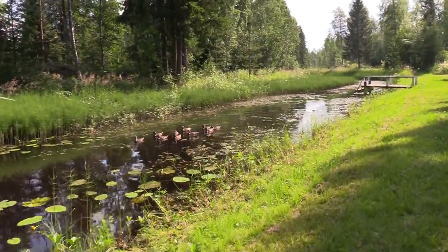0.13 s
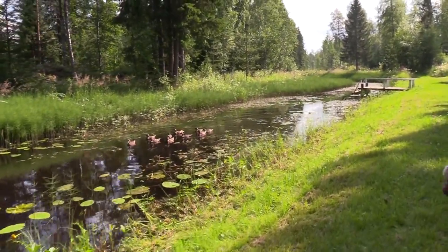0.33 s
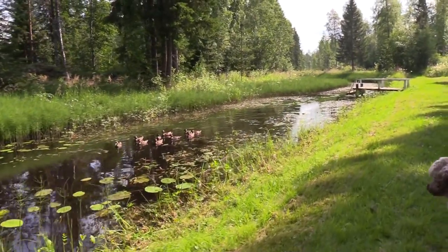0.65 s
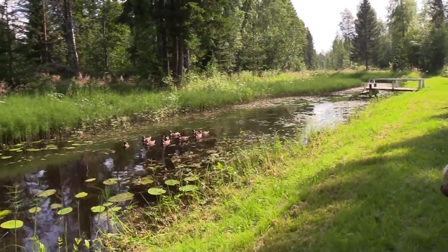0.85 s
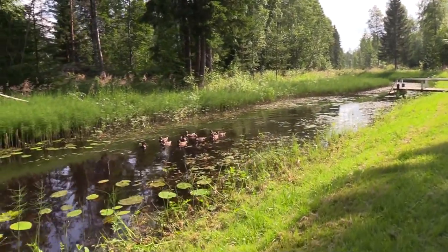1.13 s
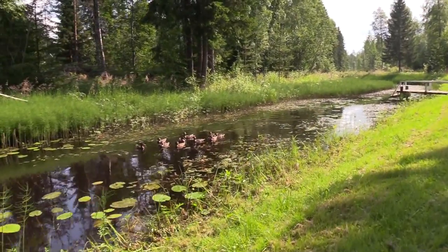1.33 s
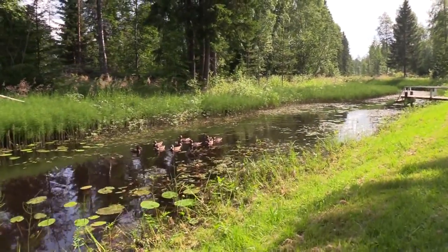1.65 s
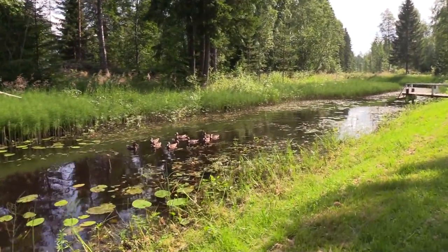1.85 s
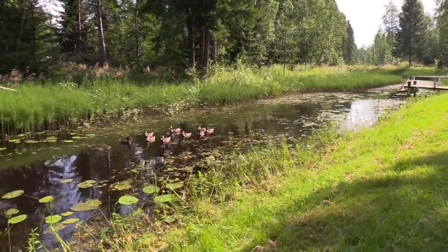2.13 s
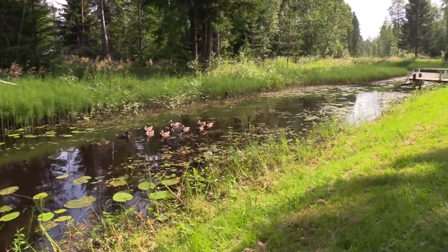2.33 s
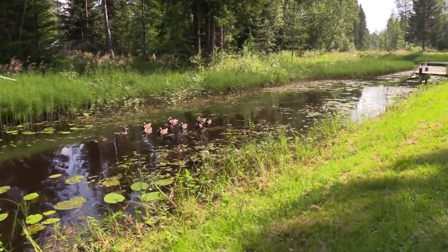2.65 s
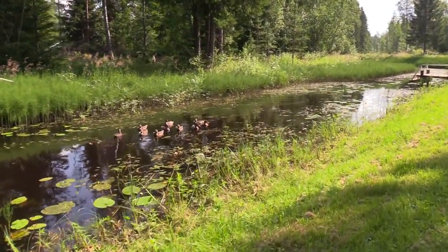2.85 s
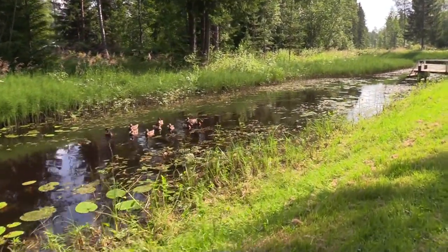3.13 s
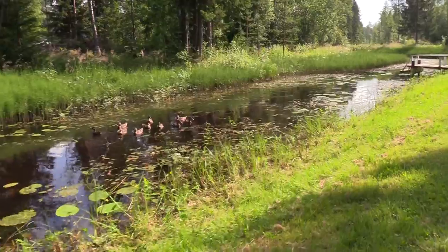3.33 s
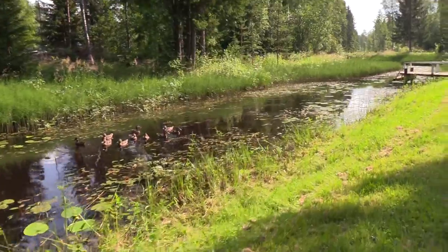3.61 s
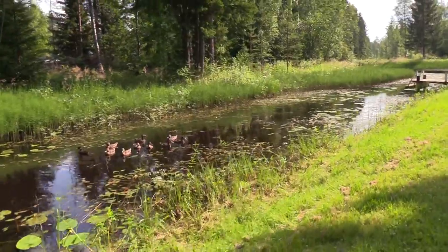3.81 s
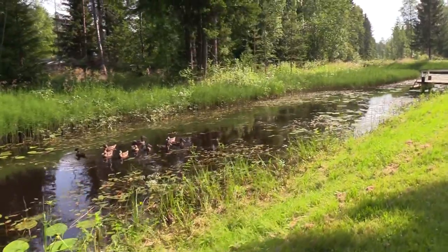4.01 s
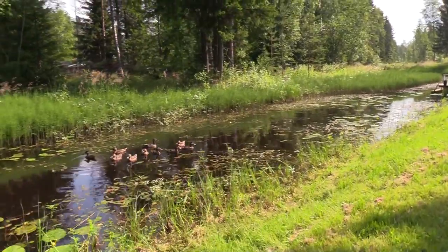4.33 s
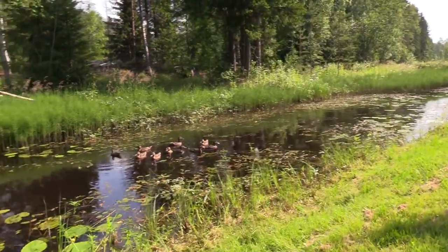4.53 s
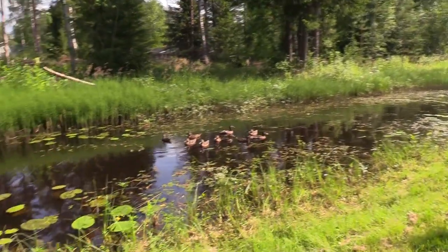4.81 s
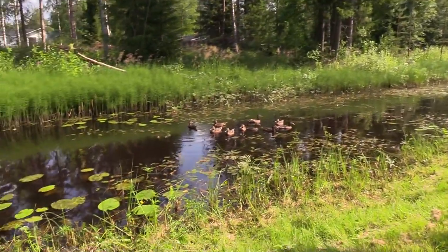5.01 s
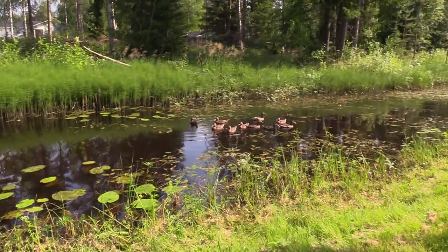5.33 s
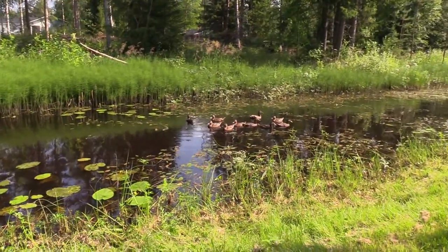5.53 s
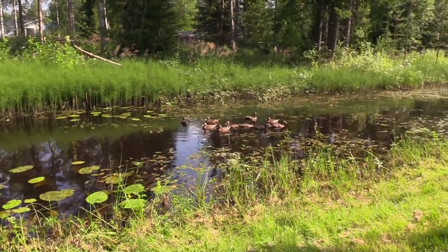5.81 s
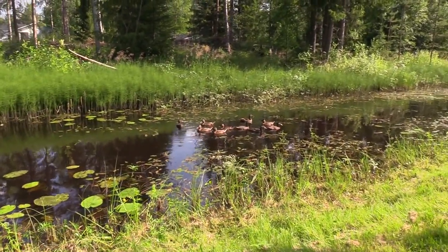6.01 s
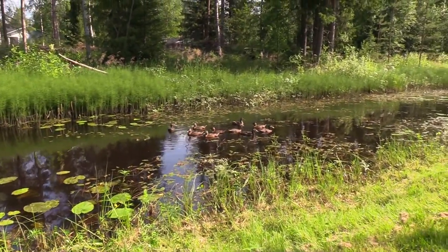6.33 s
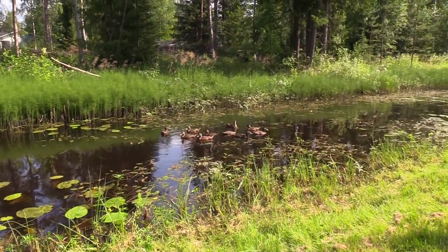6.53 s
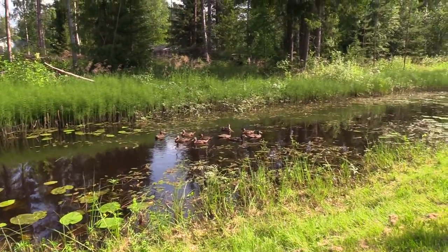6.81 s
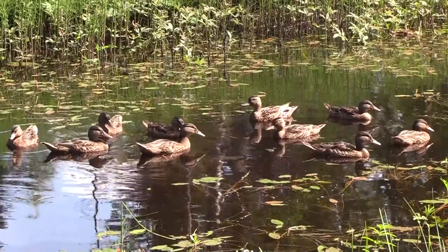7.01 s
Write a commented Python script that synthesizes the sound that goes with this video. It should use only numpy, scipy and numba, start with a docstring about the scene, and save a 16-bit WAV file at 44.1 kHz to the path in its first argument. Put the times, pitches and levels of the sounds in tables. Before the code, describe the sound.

A duck quacks nine times on a pond, in front and slightly to the left. The first quack is already ending at the start; the others come at about 0.7, 1.6, 2.7, 3.5, 4.3, 5.1, 6 and 6.9 seconds. Each is short, nasal and raspy, with a faint forest echo, and the later ones are slightly longer and louder. Small water plips sound during the first two seconds, and stalks snap with light dry ticks until about 3.4 seconds. Shoes scuff softly in grass now and then, most clearly at 2 seconds, with tiny gritty squeaks near 4.6 and 5 seconds. The hand-held microphone takes dull low bumps, strongest at about 0.3 and 5.1 seconds, and rumbles faintly as the grip shifts from 2 seconds on. Deep, soft wind gusts and a quiet hiss of leaves and reeds run underneath throughout.

```python
"""A mallard hen quacks nine times on a pond, and the forest behind answers with a faint tail.
Each quack starts as a soft tone, then her syrinx splits it into strong and weak slaps
that ring her throat near 2 kHz. On the bank, shoes scuff and squeak in the grass, water plips
and stalks snap. The hand-held camera bumps and rumbles, over low wind and a hiss of leaves."""
import sys
import numpy as np
from scipy import signal
from scipy.fft import rfft, irfft
from scipy.io import wavfile
from scipy.ndimage import uniform_filter1d
from numba import njit

SR = 44100
rng = np.random.default_rng(int(sys.argv[2]) if len(sys.argv) > 2 else 0)


def dump_mix(stems):
    """Bounce the given channels to the path in sys.argv[1] as a 16-bit WAV at rate SR."""
    frames = np.atleast_2d(stems).T  # one column per channel
    limited = np.clip(frames, -1, 1)  # hard clip at full scale
    pcm = np.round(limited * 32767).astype(np.int16)
    wavfile.write(sys.argv[1], SR, pcm)


N = 315756
TIME = np.arange(N) / SR
SIDE = np.array([[1], [-1]])  # opposite polarity left and right, for width


# Each row: start and end in seconds, pitch in Hz, yelp and dip as shares of the pitch, tone and rasp
# levels in dB, rasp swell in dB per second, bill opening time and hoarse time in seconds,
# settled roughness 0-1, lead-in in seconds, throat tuning ratio, limp 0-1, buzz against rasp in dB,
# left minus right in dB, beak shape.
QUACK_CUES = [(-.12, 0.043, 392.3, 0.084, 0.032, -34.5, -26, 26, 0.027, .06, 0.37, 0.041, 1.007, 0.2, -15.5, 2.5, "loose"),
              (0.732, 0.883, 393, .11, .04, -33, -27.5, 42, 0.016, 0.13, 0.74, 0.036, 0.98, 0, -13, 2.6, "loose"),
              (1.578, 1.745, 393.6, .12, .04, -32, -23.5, 39, 0.016, 0.066, 0.21, 0.038, 0.96, .1, -11.5, 2.5, "tight"),
              (2.653, 2.811, 389.8, 0.067, 0.011, -33, -25, 43, 0.023, 0.11, 0.42, .045, 0.96, .1, -9.5, 2.5, "tight"),
              (3.524, 3.692, 386, .08, .035, -33, -26.5, 41, 0.023, 0.11, .22, 0.054, 0.97, 0.05, -15.5, 2.5, "loose"),
              (4.279, 4.474, 379.3, .08, 0.086, -30.5, -20.5, 36, 0.02, .08, 0.72, 0.036, 0.98, 0.58, -15.5, 2.5, "loose"),
              (5.087, 5.29, 385.7, .03, .13, -30.5, -20.5, 28.5, .02, 0.12, 0.73, .025, 0.962, 0.71, -17, 4, "loose"),
              (6.002, 6.196, 391, .15, 0.13, -30.5, -22, 23, 0.02, 0.048, 0.56, 0.037, 0.97, 0.64, -16.5, 4.1, "loose"),
              (6.891, 7.074, 423, .04, 0.032, -31, -21, 59, 0.024, 0.15, 0.7, .013, 1.038, 0.3, -15, 3.5, "high")]

def hen():
    """The hen calls, each quack running from its lead-in until her throat has rung out."""
    out = np.zeros((2, N))
    for start, end, *delivery, lead_s, tuning, limp, buzz_db, pan_db, beak in QUACK_CUES:
        t = np.arange(start - lead_s, end + .04, 1 / SR)
        voice = effort(t - start, end - start, *delivery)
        add(out, t[0], quack(t, end, voice, tuning, limp, buzz_db, pan_db, beak))
    return out


def effort(t, length, pitch, yelp, dip, tone_db, rasp_db, rasp_db_per_s, open_s, hoarse_s, settled):
    """Pitch, tone level, rasp level and roughness of a quack; t is 0 as the voice comes full."""
    attack_s, attack_db, lead_db_per_s, swell_db_per_s = .0098, 10, 330, 13.5
    clear, hoarse = .063, .79
    # The pitch yelps just before the voice comes full, then dips as it breaks into a rasp.
    yelp_shape = np.exp(-((t + .015) / .012) ** 2)
    sink = np.maximum(t, 0) / .021
    dip_shape = (sink * np.exp(1 - sink)) ** 2
    flutter = .005 * wander(70)[:len(t)]
    hz = pitch * (1 + yelp * yelp_shape - dip * dip_shape + flutter)
    remaining_s = np.maximum(length - t, 0)
    fade_in_db = attack_db * ramp(-t, attack_s) + lead_db_per_s * np.maximum(-t - attack_s, 0)
    tone = tone_db - swell_db_per_s * remaining_s - fade_in_db
    shut_bill_db = -15.5 * np.exp(-t / open_s)
    rasp = rasp_db - rasp_db_per_s * remaining_s + shut_bill_db
    rough = clear + (hoarse - clear) * ramp(t, .026) + (settled - hoarse) * ramp(t - hoarse_s, .023)
    return hz, tone, rasp, rough


def syrinx(t, end, hz, push, rough, limp):
    """One slap a cycle; as she pushes, every second one weakens. Gives soft, hard and sharp trains."""
    sag = .055 * ramp(t - end + .005, .011)  # the pitch sags as she lets the pressure go
    cycles = np.cumsum(hz * (1 - sag)) / SR
    beat = np.arange(int(cycles[-1]))
    beat_s = np.interp(beat, cycles, t)
    split, wild = np.interp(beat_s, t, push), np.interp(beat_s, t, rough)
    weak, late = beat % 2, beat % 4 == 0
    time_scatter, size_scatter, drop_scatter = rng.standard_normal((len(beat), 3)).T
    jitter_s = .000075 * wild * (1 + 1.5 * weak) * time_scatter
    size = undb(1.9 * wild * size_scatter)
    weakening = split * weak * np.exp(-.2 * wild * drop_scatter ** 2)
    # The limp sets in towards mid-call: every other strong slap lands late.
    strain = np.clip(3 * (beat_s - t[0]) / (end - t[0]) - 1, 0, 1)
    slap_s = beat_s - t[0] + .00026 * limp * strain * late + jitter_s

    def slaps(drop, breath, puff_s):
        """A train of slaps, each trailing a puff of turbulent air."""
        pulses = clicks(slap_s, size * (1 - drop * weakening), len(t))
        puffs = signal.lfilter([1], [1, -np.exp(-1 / (puff_s * SR))], np.abs(pulses))
        return steady(pulses) + breath * steady(puffs * rng.standard_normal(len(t)))

    soft = slaps(drop=.52, breath=.14 * rough, puff_s=.002)
    hard = slaps(drop=.68, breath=.1 + .36 * rough, puff_s=.0012)
    sharp = slaps(drop=.41, breath=.3 + .6 * rough, puff_s=.001)
    return soft, hard, sharp


# Throat EQ for the tone and for the rasp, and treble resonances for each beak shape.
# Each row: frequency in Hz, gain in dB.
THROAT_TONE_EQ = [(150, -29), (200, -1), (390, 3.5), (490, -3.5), (580, 2.5), (790, -1.5), (960, 6.5),
                  (1180, -1.5), (1350, 8.5), (1620, -13), (2000, -35)]
THROAT_RASP_EQ = [(700, -7), (1100, -18.5), (1370, 8.5), (1550, -9), (1750, 10), (1980, 8.5), (2180, 9),
                  (2400, 2), (2700, -6), (3100, -22.5), (4000, -41)]
BEAK_EQS = {"tight": [(2600, -15.5), (3300, -12), (3800, -9.5), (4500, -12.5), (5300, -10), (5950, 0.5),
            (6500, -2), (7200, -3), (8400, -13), (9600, -17.5), (11000, -23), (15000, -41)],
            "loose": [(2500, -9.5), (2950, 3.5), (3400, -3.5), (3850, -.5), (4300, -8.5), (4900, 2),
            (5400, -4), (5950, 1), (6500, -6), (7200, -3.5), (7700, -8.5), (9100, -6.5), (11000, -20),
            (15000, -38)], "high": [(2500, -22), (2850, 6.5), (3300, -3), (4400, -4.5), (4900, -13),
            (5800, -13), (6400, 2.5), (7000, -10), (7600, -7), (8500, -15), (10500, -15.5), (15000, -36)]}

def quack(t, end, voice, tuning, limp, buzz_db, pan_db, beak):
    """The slaps ring throat and beak in three layers: round tone, mid rasp and bright buzz."""
    hz, tone_db, rasp_db, rough = voice
    rasp_over_tone_db = rasp_db - tone_db
    push = ramp(rasp_over_tone_db + 12.5, 16.5)
    soft, hard, sharp = syrinx(t, end, hz, push, rough, limp)
    tone = bill(colour(soft, THROAT_TONE_EQ, tuning), rasp_over_tone_db)
    rasp = bill(colour(hard, THROAT_RASP_EQ, tuning), rasp_over_tone_db)
    # The faint lead-in is a thin whistle on the second harmonic.
    whistle = steady(band(tone, 550, 1000))
    fullness = ramp(tone_db + 46.5, 10)
    tone = steady(fullness * tone + (1 - fullness) * whistle)
    # Through a narrow bill the buzz is one nasal band; it spreads as the bill opens.
    nasal = undb(5) * steady(band(sharp, 4120, 5740))
    buzz = push * steady(colour(sharp, BEAK_EQS[beak])) + (1 - push) * nasal
    after_s = np.maximum(t - end - .003, 0)
    gate = ramp(t - t[0], .0013) * np.exp(-after_s / .0043)
    throat = gate * (tone * undb(tone_db) + rasp * undb(rasp_db))
    # The sudden stop leaves the low throat resonance ringing for a moment.
    throat += undb(tone_db - 3) * np.sin(2 * np.pi * 560 * after_s) * np.exp(-after_s / .0059)
    return pan(throat, pan_db) + gate * buzz * undb(rasp_db + buzz_db)


# Each row: rasp over tone in dB, low-pass cutoff in Hz.
BILL_OPENING = [(-28, 800), (-25, 2300), (-4, 1550), (-1.5, 5000), (2, 4140)]

def bill(x, rasp_over_tone_db, damping=.81):
    """The bill opens with effort and lets the upper resonances through."""
    cutoff_hz, = curves(BILL_OPENING, rasp_over_tone_db)
    return steady(sweep(sweep(x, cutoff_hz, damping), cutoff_hz, damping))


# EQ on the echo send. Each row: frequency in Hz, gain in dB.
ECHO_EQ = [(200, -33), (900, -9), (1400, -4), (2100, 0.5), (3000, 8), (6000, 3), (12000, -1)]

def forest(x, bank_t60=.26, trees_t60=1.2):
    """Quick scatter from reeds and banks, then a long faint tail from the trees."""
    t = TIME[:SR]
    bank = undb(-18) * unit(undb(-60 * t / bank_t60))
    trees = undb(-22) * unit(undb(-60 * t / trees_t60))
    decay = (bank + trees) * ramp(t - .004, .0083) / np.sqrt(SR)
    send = colour(x, ECHO_EQ)
    mid, side = (signal.fftconvolve(send, decay * rng.standard_normal(SR))[:N] for _ in range(2))
    return pan(mid, 1.7) + .033 * side * SIDE


# EQ of grass and of soft ground. Each row: frequency in Hz, gain in dB.
GRASS_EQ = [(180, -45), (300, -8), (414, -35), (456, 1), (502, -10), (599, -1.5), (1230, -3.5),
            (2550, -6.5), (6370, -11), (14000, -33)]
GROUND_EQ = [(300, -24), (650, -4), (1250, 3), (2000, -4), (2800, -18), (8000, -25)]
# Each row: crest, rise and fall in seconds, level in dB, share of soft ground 0-1.
SCUFF_CUES = [(.65, 0.13, .2, -50, 0), (1.28, 0.037, 0.065, -57, 0), (1.48, 0.18, 0.082, -55, 0.7),
              (1.967, 0.031, .035, -36.5, 0.45), (2.005, 0.023, 0.065, -37.5, 0.87),
              (2.66, 0.036, .05, -48, 0.3), (3.371, 0.052, .06, -63, 0), (4.14, 0.031, 0.038, -49.5, .2),
              (4.896, 0.068, 0.051, -48, 0.17), (4.995, 0.022, 0.024, -43.5, 0.4)]

def shoe_scuffs():
    """Soles drag through grass and over soft ground in dense grains."""
    grass, ground, out = noise(GRASS_EQ), noise(GROUND_EQ), np.zeros(N)
    for crest, rise, fall, db, soft in SCUFF_CUES:
        surface = np.sqrt(1 - soft) * grass + np.sqrt(soft) * ground
        out += undb(db) * swell(crest, rise, fall) * surface
    grain = unit(undb(3.3 * wander(350)))
    return out * grain


# Each row: centre and half length in seconds, pitch in Hz, glide in octaves per second, level in dB.
SQUEAK_CUES = [(2.0835, .0025, 6600, -26, -42.5), (4.632, .0025, 6370, 27, -32.5),
               (4.639, 0.0099, 2300, 0, -38.5), (4.644, 0.0052, 6300, -86, -35.5),
               (4.6482, .002, 1900, -130, -21.5), (4.655, 0.0044, 1344, -70, -27.5),
               (4.993, .003, 7000, -22, -44), (5.002, 0.0043, 5100, -100, -39.5),
               (5.008, 0.0032, 1650, -210, -35)]

def sole_squeaks(waver=.061, overtone_below_hz=7350):
    """Rubber sticks and slips in tiny gritty chirps, most of them falling."""
    out = np.zeros(N)
    grit = noise([(500, -3.5), (1000, -.5), (1900, 10.5), (3200, -11), (5500, -2.5), (12000, -15)])
    for centre, half_s, pitch, glide, db in SQUEAK_CUES:
        t = np.arange(-2 * half_s, 2 * half_s, 1 / SR)
        hz = pitch * 2 ** (glide * t)
        phase = 2 * np.pi * np.cumsum(hz * (1 + waver * wander(900)[:len(t)])) / SR
        overtone = undb(-14) * np.sin(2 * phase) * (hz < overtone_below_hz)
        chirp = np.sqrt(2) * (np.sin(phase) + overtone)
        slip = np.exp(-(t / half_s) ** 2)
        add(out, centre + t[0], undb(db) * slip * (chirp + undb(-4) * grit[:len(t)]))
    return out


# Each row: start in seconds, level in dB, pitch in Hz, ring time in seconds, tap against ring in dB.
PLIP_CUES = [(.153, -35, 1150, 0.045, -6), (0.323, -40, 2640, 0.035, -1), (0.419, -36, 905, 0.018, -6.5),
             (.639, -36, 790, 0.018, 3), (.939, -35, 1150, .013, -1), (1.068, -38, 894, 0.012, -3),
             (1.14, -36, 1190, .009, -1.5), (1.986, -22.5, 1300, .007, -2), (2.049, -27, 890, .009, -6),
             (5.951, -45, 1200, .008, 1)]

def water_plips():
    """Each plip is a short tap with a ring that bends upward."""
    out = np.zeros(N)
    for start, db, hz, t60, tap_db in PLIP_CUES:
        tap_eq = [(.42 * hz, -14), (hz, 0), (1.24 * hz, -4), (3 * hz, -26)]
        add(out, start, undb(db) * ring(hz, t60, glide=.12))
        add(out, start, undb(db + tap_db) * burst(tap_eq, t60=.016))
    return out


# Each row: start in seconds, level in dB.
SNAP_CUES = [(0.13, -27.5), (0.2664, -34), (0.4539, -35), (0.9017, -29), (1.219, -39), (2.2038, -34),
             (2.3355, -39), (2.4602, -34), (3.349, -40), (3.3876, -38)]

def stalk_snaps(trim_db=-2):
    """Stalks break with a dry, bright tick."""
    out = np.zeros(N)
    snap_eq = [(2500, -3), (7000, 5), (10000, -5), (14000, -15)]
    for start, db in SNAP_CUES:
        add(out, start, undb(db + trim_db) * burst(snap_eq, t60=.01))
    return out


# Each row: start in seconds, level in dB, pitch in Hz, ring time in seconds.
BUMP_CUES = [(.252, -23, 83.6, 0.56), (1.715, -36, 84.5, 0.3), (1.961, -32.5, 86.2, 0.18),
             (2.145, -31.5, 79, 0.43), (2.692, -36, 92.5, 0.63), (4.589, -41, 66.6, 0.6),
             (4.886, -30.5, 71.4, 0.63), (5.069, -24, 112, 0.16), (5.703, -36, 90.6, 0.62)]

def camera_bumps(ring_db=1.5, knock_db=-7):
    """A dull knock sets the camera body ringing low."""
    out = np.zeros(N)
    knock_eq = [(40, 12), (130, 12), (290, 3.5), (500, -11)]
    for start, db, hz, t60 in BUMP_CUES:
        add(out, start, undb(db + ring_db) * ring(hz, t60))
        add(out, start, undb(db + knock_db) * burst(knock_eq, t60=.18))
    return out


# EQ of the hand's rumble. Each row: frequency in Hz, gain in dB.
HANDLING_EQ = [(40, -27), (65, -5.5), (83, 3), (105, -4.5), (125, -6), (150, -19), (185, -15), (240, -32),
               (290, -15), (450, -50.5)]
# Each row: crest and fall in seconds, level in dB.
GRIP_CUES = [(1.02, 0.096, -56), (2.17, 0.12, -38.5), (2.724, 0.13, -37.5), (3.102, 0.072, -39.5),
             (3.33, 0.19, -45.5), (4.042, 0.15, -43), (4.606, 0.12, -38.5), (4.867, 0.25, -39),
             (5.2, 0.13, -35.5), (5.65, 0.13, -39), (6.374, 0.14, -44.5)]

def handling_rumble(rise_s=.064, hold_db=-52, trim_db=-1):
    """The hand rumbles faintly on the camera and swells each time it shifts its grip."""
    shifts = sum(undb(db) * swell(crest, rise_s, fall) for crest, fall, db in GRIP_CUES)
    level = np.hypot(undb(hold_db), shifts) * undb(trim_db)
    mid, side = (noise(HANDLING_EQ, size=8192) * level for _ in range(2))
    return pan(mid, 1.9) + undb(-4) * side * SIDE


# Sub-bass EQ of the wind. Each row: frequency in Hz, gain in dB.
WIND_EQ = [(8, 2), (17, -1), (26, -10), (38, -17), (55, -24.5), (110, -28.5)]
# Each row: time in seconds, level in dB.
GUST_FADER = [(0.0, -48), (0.28, -35), (0.44, -41.5), (2.65, -45), (3.05, -41), (4.25, -48), (4.95, -39),
              (5.94, -46), (6.38, -40), (6.54, -47.5), (6.84, -41), (7.16, -52)]

def wind(trim_db=7):
    """Gusts buffet the microphone with a deep rumble."""
    gust_db, = curves(GUST_FADER, TIME)
    return pan(noise(WIND_EQ, size=16384) * undb(gust_db + trim_db), 1.9)


# EQ of leaves and reeds. Each row: frequency in Hz, gain in dB.
LEAF_EQ = [(120, -27), (200, -8), (282, -6), (383, -8.5), (1070, -12), (1780, -17.5), (1980, -17.5),
           (3470, -20), (8120, -22), (13700, -28.5), (15000, -58)]
# Each row: time in seconds, level in dB.
BREEZE_FADER = [(0, -54.5), (5.4, -54.5), (5.8, -59.5), (7.16, -58.5)]

def leaves():
    """Leaves and reeds hiss restlessly in the breeze, over a faint, wide bed of air."""
    breeze_db, = curves(BREEZE_FADER, TIME)
    rustle = noise(LEAF_EQ) * undb(breeze_db + 1.15 * wander(7.1) + 1.25 * wander(120))
    air = undb(-57.5) * noise([(150, -13), (1000, -17), (2800, -28)])
    return rustle + air * SIDE


def ring(hz, t60, glide=0):
    """One mode that falls 60 dB in t60 seconds; its pitch may drift upward."""
    t = TIME[:int(t60 * SR)]
    return np.sin(2 * np.pi * hz * t * (1 + glide * t / t60)) * undb(-60 * t / t60)


def burst(eq, t60):
    """A short fading noise of peak 1."""
    t = TIME[:SR // 8]
    x = colour(rng.standard_normal(len(t)) * undb(-60 * t / t60), eq)
    return x / np.abs(x).max()


def noise(eq, size=2048):
    """Coloured noise of rms 1."""
    return unit(colour(rng.standard_normal(N), eq, size=size))


def clicks(times, sizes, count, order=8):
    """Band-limited impulses at exact times."""
    at = times[:, None] * SR
    taps = np.floor(at).astype(int) + np.arange(1 - order, order + 1)
    pulses = np.sinc(taps - at) * np.sinc((taps - at) / order) * sizes[:, None]
    return np.bincount(np.clip(taps, 0, count).ravel(), pulses.ravel(), count + 1)[:count]


def colour(x, eq, tuning=1, size=2048):
    """Causal EQ through (Hz, dB) points, their frequencies scaled by tuning."""
    hz, db = np.transpose(eq)
    f = np.maximum(np.arange(size + 1) * SR / (2 * size), 1)
    skirts_db = -24 * np.maximum(np.log2(f / hz[-1]), 0) - 12 * np.maximum(np.log2(hz[0] / f), 0)
    response_db = np.interp(np.log(f), np.log(hz * tuning), db) + skirts_db
    cepstrum = irfft(np.log(undb(response_db)))
    cepstrum[1:size] *= 2  # fold to minimum phase, so nothing rings ahead of a hit
    cepstrum[size + 1:] = 0
    return signal.fftconvolve(x, irfft(np.exp(rfft(cepstrum))))[:len(x)]


def band(x, lo_hz, hi_hz):
    """Plain band-pass."""
    return signal.sosfilt(signal.butter(2, [lo_hz, hi_hz], "band", fs=SR, output="sos"), x)


@njit
def sweep(x, hz, damping):
    """State-variable low-pass whose cutoff moves every sample."""
    y, band_state, low_state = np.empty(len(x)), 0., 0.
    for i in range(len(x)):
        g = np.tan(np.pi * hz[i] / SR)
        bandpass = (band_state + g * (x[i] - low_state)) / (1 + g * (g + damping))
        y[i] = low_state + g * bandpass
        band_state, low_state = 2 * bandpass - band_state, 2 * y[i] - low_state
    return y


def wander(rate_hz):
    """Smooth random modulation of rms 1."""
    hold = int(SR / rate_hz)
    steps = np.repeat(rng.standard_normal(N // hold + 1), hold)
    return unit(uniform_filter1d(steps, hold)[:N])


def swell(crest, rise, fall):
    """A smooth hump of height 1 at the crest time."""
    width = np.where(TIME < crest, rise, fall)
    return np.exp(-np.minimum(((TIME - crest) / width) ** 2, 50))


def ramp(x, length):
    """Rise from 0 to 1 over the given length."""
    return np.clip(x / length, 0, 1)


def curves(rows, at):
    """Read a table's later columns along its first, joined by straight lines."""
    knots, *columns = np.transpose(rows)
    return [np.interp(at, knots, column) for column in columns]


def steady(x, size=900):
    """Hold the rms at 1 over a few voice cycles."""
    return x / np.sqrt(uniform_filter1d(uniform_filter1d(x ** 2, size), size // 2) + 1e-12)


def unit(x):
    """Scale to rms 1."""
    return x / np.sqrt(np.mean(x ** 2))


def undb(db):
    """Decibels to gain."""
    return 10 ** (np.asarray(db) / 20)


def pan(x, db):
    """Place a sound by its left minus right level."""
    return x * undb(np.array([[db], [-db]]) / 2)


def add(track, start_s, x):
    """Mix x into the track from start_s on, trimming any overhang."""
    start = int(start_s * SR)
    x, start = x[..., max(-start, 0):], max(start, 0)
    track[..., start:start + x.shape[-1]] += x[..., :max(N - start, 0)]


def scene():
    """The hen and her echo up front, small sounds on the bank, rumble and leaves underneath."""
    voice = hen()
    echo = forest(voice.mean(axis=0))
    shoes = pan(shoe_scuffs() + sole_squeaks(), .48)
    small_sounds = pan(water_plips() + stalk_snaps() + camera_bumps(), 2.4)
    return voice + echo + shoes + small_sounds + handling_rumble() + wind() + leaves()


def record(dry, top_hz=14700):
    """The camera cuts the top with a steep low-pass."""
    return signal.sosfilt(signal.ellip(8, .2, 70, top_hz, fs=SR, output="sos"), dry)


dry = scene()
out = record(dry)
dump_mix(out)
```